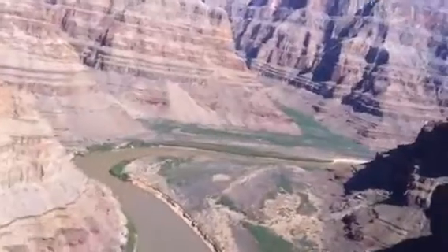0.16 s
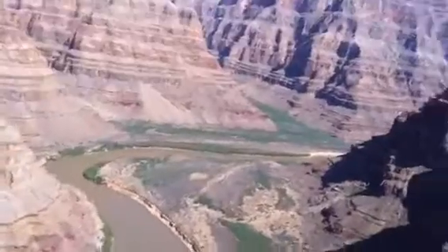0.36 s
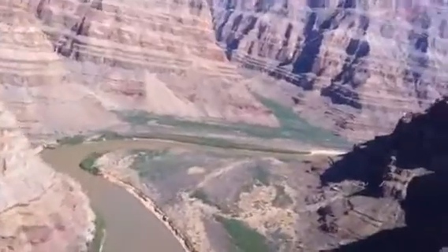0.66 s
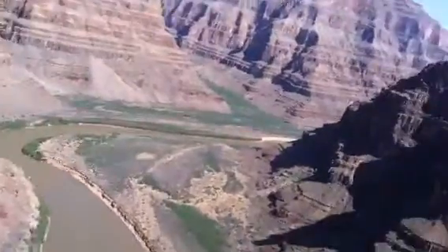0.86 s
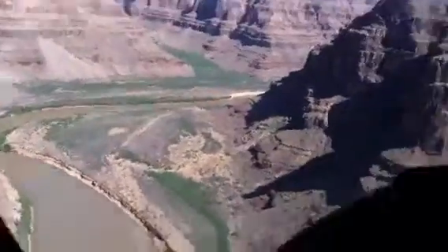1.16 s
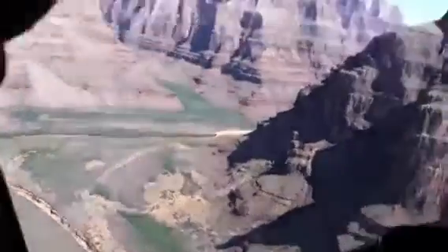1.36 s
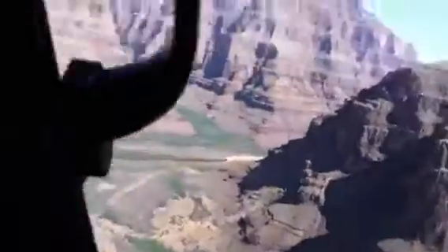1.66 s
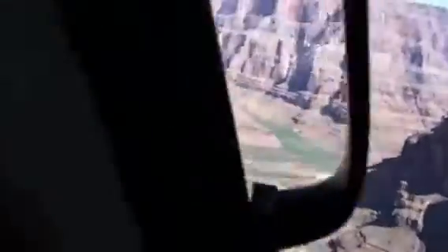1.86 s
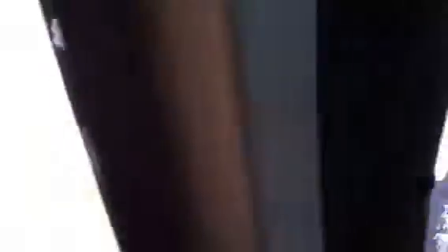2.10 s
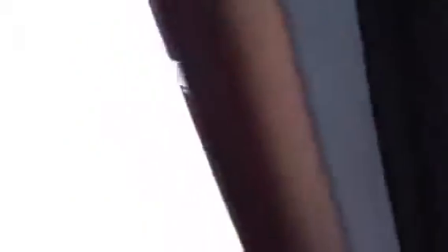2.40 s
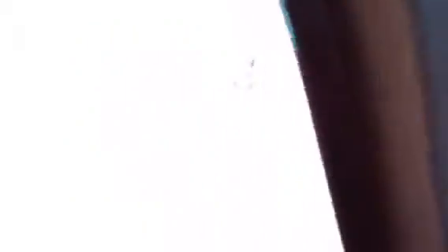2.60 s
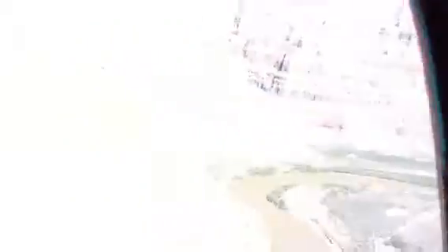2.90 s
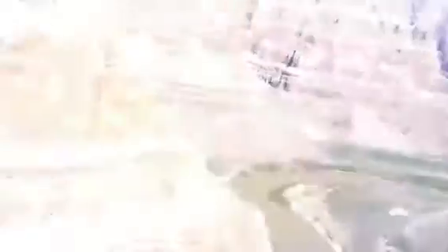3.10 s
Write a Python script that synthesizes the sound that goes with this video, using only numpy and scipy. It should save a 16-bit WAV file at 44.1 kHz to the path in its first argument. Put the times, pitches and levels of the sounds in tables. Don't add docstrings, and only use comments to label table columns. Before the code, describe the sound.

Inside a cruising helicopter, a dull low roar throbs with about nineteen blade thumps per second over a steady low hum and faint gear whine. The slap recedes around 0.5 s and returns by 1 s. A sharp handling tick comes at 2.36 s, a brief airy rush at 2.5 s, faint ticks until 2.9 s, then loud bright rushing air bursts from 3.04 s, fluctuating to the end at about 3.25 s.

```python
import sys
import numpy as np
from scipy import signal
from scipy.fft import rfft, irfft
from scipy.io import wavfile

SR = 44100
rng = np.random.default_rng(int(sys.argv[2]) if len(sys.argv) > 2 else 0)


def voltage_ratio(level):
    return 10 ** (np.asarray(level, float) / 20)


def log_audio(samples):
    frames = np.atleast_2d(samples).T
    limited = np.clip(frames, -1, 1)
    pcm = np.round(limited * 32767).astype(np.int16)
    wavfile.write(sys.argv[1], SR, pcm)


N = 143325
BLADE_HZ, FIRST_BLADE_S = 19.435, 0.004


def rms_one(x):
    return x / np.sqrt(np.mean(x ** 2) + 1e-20)


def in_time(rows):
    times, *columns = np.transpose(rows)
    return [np.interp(np.arange(N) / SR, times, column) for column in columns]


def at_hz(points, hz):
    table_hz, table_db = np.transpose(points)
    return np.interp(np.log(hz), np.log(table_hz), table_db)


def drift(rate_hz):
    r = np.exp(-2 * np.pi * rate_hz * 40 / SR)
    noise = rng.standard_normal(N // 40 + 2002)
    slow = signal.lfilter([1], [1, -2 * r, r * r], noise)[2000:]
    return np.interp(np.arange(N) / 40, np.arange(len(slow)), rms_one(slow))


def coloured(spectrum, hz):
    white = rfft(rng.standard_normal(N))
    return rfft(rms_one(irfft(white * voltage_ratio(at_hz(spectrum, hz)), N)))


def banded_noise(spectrum, patchy_db, extra_db):
    f = np.maximum(np.arange(N // 2 + 1) * SR / N, 1)
    whole = coloured(spectrum, f)
    together = drift(1.45)
    out = 0
    for hz in 22 * 2 ** np.arange(0, 10, 1 / 3):
        share = np.clip(1 - 3 * abs(np.log2(f / hz)), 0, 1)
        flicker_db = patchy_db * (0.93 * together + drift(13))
        out = out + irfft(whole * share, N) * voltage_ratio(flicker_db + extra_db(hz))
    return out


# (pitch [Hz], level [dB per Hz])
HISS = [(1000, -22.5), (4000, 1), (7500, -3), (11000, -7), (14000, -3)]


def hiss():
    hz = np.arange(1, N // 2 + 2) * SR / N
    return voltage_ratio(-73.5) * irfft(coloured(HISS, hz), N)


# (time [s], peak level [dB])
TICKS = [
    (1.471, -55),
    (2.3628, -31),
    (2.378, -41),
    (2.614, -48),
    (2.72, -50),
    (2.848, -50),
    (2.87, -46),
]


def ticks():
    clicks = np.full(N, 1e-18)
    for s, peak_db in TICKS:
        clicks[int(s * SR)] = voltage_ratio(peak_db + 14.5)
    housing = signal.butter(1, [400, 3500], "band", fs=SR, output="sos")
    return signal.sosfilt(housing, clicks)


SHUT_DB, WIDE_DB = -75, -23
# (time [s], level of the bright rush [dB], extra push of the bass [dB])
OPENING = [(2.3, -66, 0), (2.38, -62, 4), (2.44, -55, 2), (2.485, -35, 4), (2.525, -36, 3), (2.565, -56, 1),
           (2.6, -60, 2), (2.635, -53, 3), (2.68, -61, 0), (2.87, -60, 0), (3.034, -64, -1),
           (3.044, -30, 3), (3.07, -22, 0), (3.1, -26, 0), (3.124, -34, -3), (3.19, -27, 0),
           (3.226, -42, 3), (3.25, -43, -2)]


def opening_db():
    level_db, push_db = in_time([(2.1, SHUT_DB, 0)] + list(OPENING))
    return level_db - WIDE_DB, push_db


# (pitch [Hz], level [dB per Hz])
RUSH = [(80, -22), (170, -1), (550, -9), (1100, -18.5), (3000, -22), (7500, -37), (10500, -49),
        (15700, -57.5)]
# (pitch [Hz], change [dB per dB])
FOLLOWS = [(100, -0.13), (300, 0.46), (1000, 0.51), (3000, 1.0), (7500, 1.42), (15000, 0.9)]


def rush(open_db, push_db):
    above_shut_db = open_db + WIDE_DB - SHUT_DB
    gate = np.clip(above_shut_db / 19.0, 0, 1)

    def extra_db(hz):
        bass_push_db = push_db / (1 + (hz / 714) ** 2)
        return at_hz(FOLLOWS, hz) * open_db + bass_push_db

    return voltage_ratio(-12) * gate * banded_noise(RUSH, 1.0, extra_db)


# (pitch [Hz], rms level [dB], wander [Hz], share of the opening's swing [dB per dB])
TONES = [(137.8, -33, 0.47, 0.34), (66.5, -54.5, 0.57, .1), (120.9, -40, 1.8, 0.11),
         (371, -46.5, 8.81, 0.67), (611, -57, 2.3, 0.56), (1287, -65.5, 3, 0.18), (1955, -79, 1.2, 1),
         (2250, -79, 2.2, .9), (2720, -78, 8, .6), (623, -63.5, 3, 0.72)]
# (time [s], pitch [Hz], rms level [dB])
WHINE = [
    (0, 1702, -74),
    (.6, 1700, -70.5),
    (1.2, 1708, -66.5),
    (1.5, 1717, -61.5),
    (2, 1712, -66.5),
    (2.6, 1702, -61.5),
    (3.25, 1701, -59.5),
]


def tones(open_db):
    whine = (*in_time(WHINE), 4.0, 0.68)
    out = 0
    for hz, level_db, wander_hz, share in list(TONES) + [whine]:
        wandering_hz = hz + wander_hz * drift(6.05)
        phase = np.cumsum(2 * np.pi * wandering_hz / SR) + rng.uniform(0, 2 * np.pi)
        lift_db = share * np.maximum(open_db + 41.5, 0) + 1.2 * drift(3.0)
        out = out + np.sqrt(2) * voltage_ratio(level_db + lift_db) * np.sin(phase)
    return out


# (time [s], blade slap level [dB], roar level [dB])
TURN = [
    (0, -2, 0.5),
    (.5, -14, 1.5),
    (1, 0.5, -0.5),
    (1.3, -2, -1.5),
    (1.8, 2, -1.5),
    (2.2, 0, 1.5),
    (2.6, 4.5, 1),
    (2.9, -16.5, -3),
    (3.25, 3, 10),
]


def turn_db():
    return in_time(TURN)


# (pitch [Hz], level [dB per Hz])
ROAR = [(62, -9), (86, -12), (98, -3), (170, 2), (300, -5.5), (690, -22.5), (2800, -45), (4000, -57.5)]


def roar(slap_db, roar_db):
    throb_lag_s = 0.007
    since_blade_s = np.arange(N) / SR - FIRST_BLADE_S - throb_lag_s
    turn = np.cos(2 * np.pi * BLADE_HZ * since_blade_s)
    throb = voltage_ratio(slap_db) * (((1 + turn) / 2) ** 1.5 - 0.45)

    def extra_db(hz):
        octaves_off = np.log2(hz / 330)
        return 5 * throb * np.exp(-(octaves_off / 0.8) ** 2)

    muffle = signal.butter(2, 4500, fs=SR, output="sos")
    return voltage_ratio(-26 + roar_db) * signal.sosfilt(muffle, banded_noise(ROAR, 1.0, extra_db))


# (pitch [Hz], level [dB], time to fall 60 dB [s])
HULL = [(98.43, -20.5, 0.59), (210, -4, 0.18), (250.5, 1.5, .07), (309, -2, 0.046), (390, -5.5, 0.026),
        (510, -7, .03)]


def slaps(slap_db):
    spread_db, jitter_s = 2.5, 0.0003
    blade_s = FIRST_BLADE_S + np.arange(-9, int(N / SR * BLADE_HZ)) / BLADE_HZ
    draw = rng.standard_normal((len(blade_s), len(HULL) + 2))
    at = ((blade_s + jitter_s * draw[:, -1] + 1) * SR).astype(int)
    ringing = np.zeros(N + 2 * SR)
    for k, (hz, level_db, t60) in enumerate(HULL):
        strikes = np.full(N + 2 * SR, 1e-18)
        uneven = 0.56 * draw[:, k] + 0.43 * draw[:, -2]
        strikes[at] = voltage_ratio(level_db + spread_db * uneven)
        r, w = voltage_ratio(-60 / (t60 * SR)), 2 * np.pi * hz / SR
        mode = signal.lfilter([0, np.sin(w)], [1, -2 * r * np.cos(w), r * r], strikes)
        ringing += mode * (-1) ** k
    soft = signal.sosfilt(signal.butter(2, 900, fs=SR, output="sos"), ringing)
    return voltage_ratio(-32.5 + slap_db) * rms_one(soft[SR:SR + N])


def scene():
    slap_db, roar_db = turn_db()
    open_db, push_db = opening_db()
    background = hiss() + ticks() + rush(open_db, push_db) + tones(open_db)
    rotor = roar(slap_db, roar_db) + slaps(slap_db)
    return (background + rotor)[None]


def top_cut(x):
    return signal.sosfilt(signal.butter(12, 15790, fs=SR, output="sos"), x)


def record(dry):
    top = 0.95
    cut = signal.sosfilt(signal.butter(4, 85, "high", fs=SR, output="sos"), dry)
    fade_db = in_time([(N / SR - 0.004, 0), (N / SR, -14)])[0]
    return top_cut(voltage_ratio(fade_db) * top * np.tanh(cut / top))


dry = scene()
out = record(dry)
log_audio(out)
```